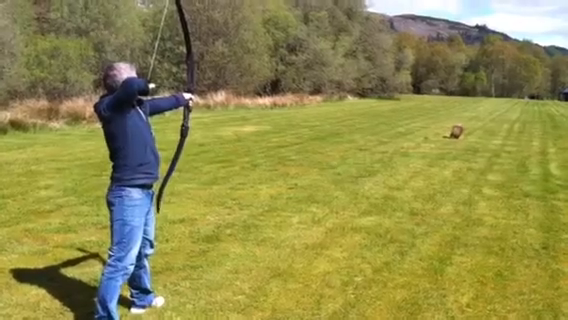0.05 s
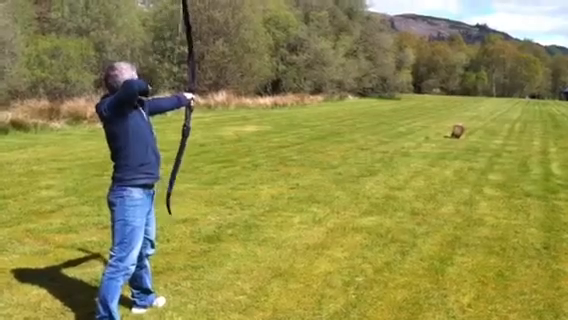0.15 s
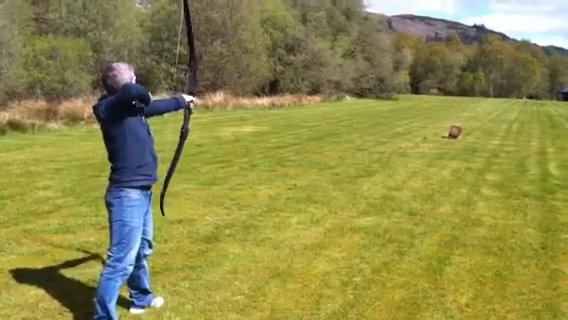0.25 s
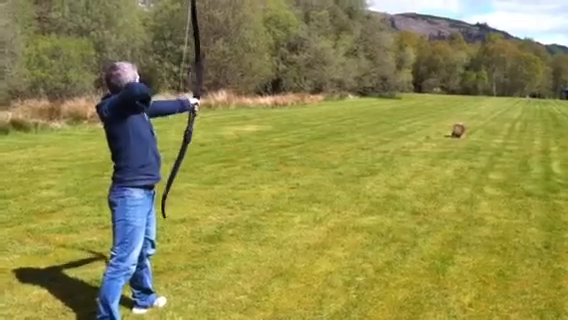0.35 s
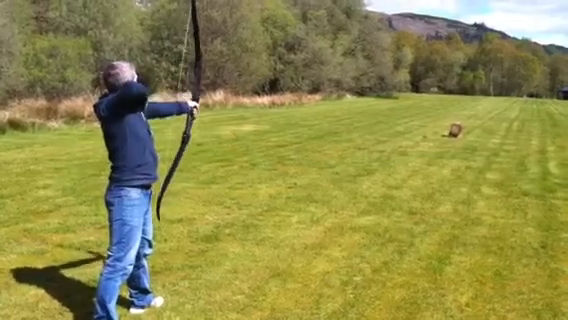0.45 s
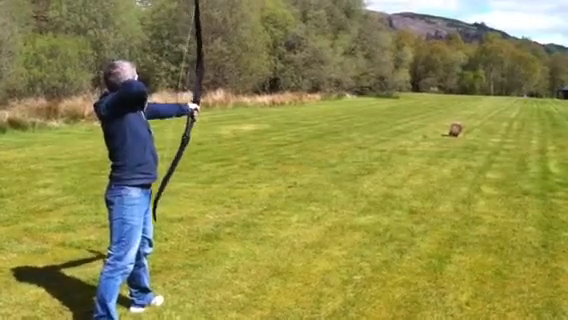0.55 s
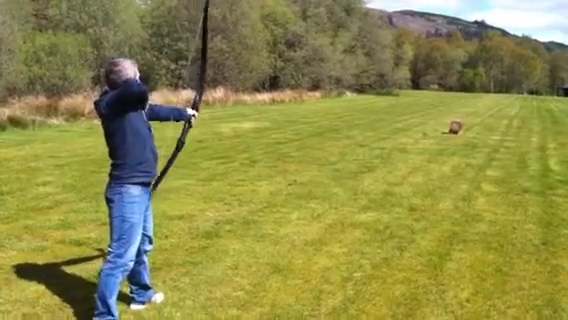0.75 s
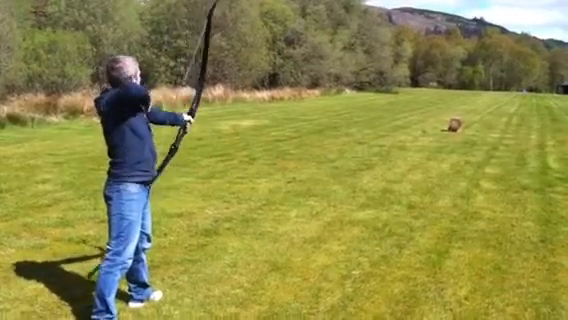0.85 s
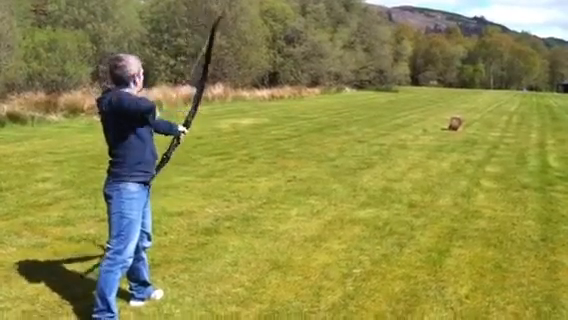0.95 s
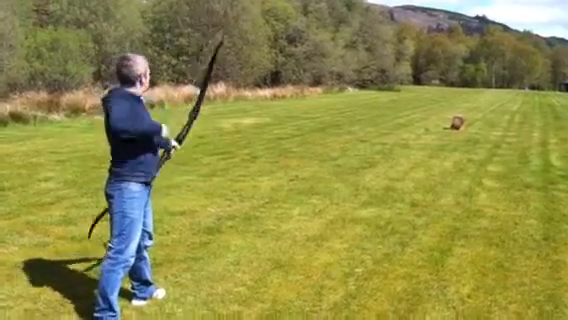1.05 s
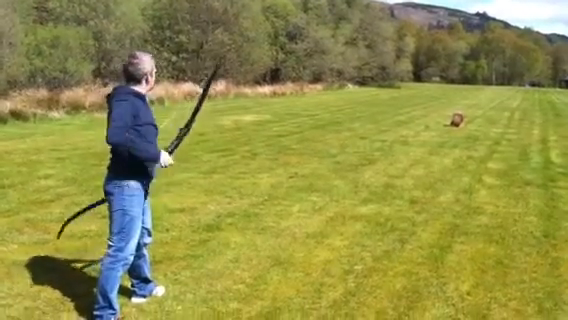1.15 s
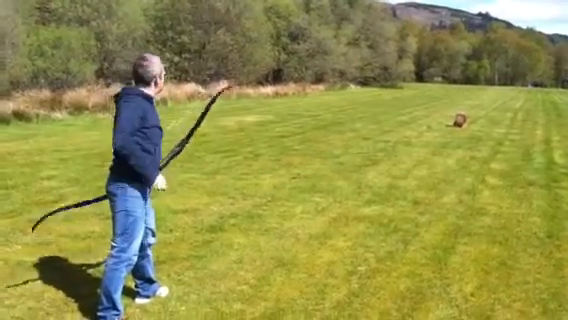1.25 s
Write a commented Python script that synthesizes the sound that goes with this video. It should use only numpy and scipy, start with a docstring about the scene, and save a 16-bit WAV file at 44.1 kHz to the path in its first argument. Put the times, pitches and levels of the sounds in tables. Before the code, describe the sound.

Sharp bowstring snap near the microphone, rattling and ringing the bow for an instant, then humming away. Thin bird whistles and soft outdoor air surround it; a faint distant tap follows, then dull low handling bumps.

```python
"""An arrow is shot on an open field. From the start there is quiet outdoor air (coloured noise), a hiss of
distant birdsong (noise that swells and sinks) and a songbird (gliding whistles smeared by the trees).
The string slips off the fingers (short tones) and the arrow ticks and scrapes along the bow (noise), with a
faint answer from the field. The string slaps home and rebounds, mostly duller each time, ringing the bow
(fading tones and noise), and hums on. Then comes a faint far tap, and near the end soft bumps on the microphone."""
import sys
import numpy as np
from scipy import signal
from scipy.fft import rfft, irfft, next_fast_len
from scipy.io import wavfile
from scipy.ndimage import map_coordinates

SR = 44100
rng = np.random.default_rng(int(sys.argv[2]) if len(sys.argv) > 2 else 0)


def dump(signal):
    """Clip the signal to [-1, 1] and save it as 16-bit WAV at the path in sys.argv[1]."""
    limited = np.clip(np.atleast_2d(signal).T, -1, 1)
    pcm = np.round(limited * 32767).astype(np.int16)
    wavfile.write(sys.argv[1], SR, pcm)


N = 57330  # length in samples, 1.3 s


def amp(db):
    """Turn decibels into a plain multiplier."""
    return 10 ** (np.asarray(db) / 20)


def unit(x):
    """Scale x to an average (rms) strength of 1."""
    return x / np.sqrt(np.mean(x ** 2) + 1e-20)


def along(points, hz):
    """Read a curve of (f/Hz, value) points, with pitch on a log axis."""
    f, value = np.transpose(points)
    return np.interp(np.log(hz + 1), np.log(f + 1), value)


def since(s):
    """Seconds passed since time s, zero before it."""
    return np.maximum(np.arange(N) / SR - s, 0)


def fade(t, t60):
    """Die away smoothly, by 60 dB every t60 seconds."""
    return np.exp(-np.log(1000) * t / t60)


def rise(t, rise_s):
    """Grow from 0 towards 1, quickly at first and then ever more slowly."""
    return 1 - np.exp(-t / rise_s)


def wobble(rate):
    """A smooth random curve through `rate` random points a second."""
    points = rng.standard_normal(int(N * rate / SR) + 4)
    return map_coordinates(points, [np.arange(N) * rate / SR])


def filtered(x, response):
    """Strengthen or weaken each frequency of x as `response` says."""
    m = next_fast_len(N + SR // 2)  # spare room, so the end does not wrap round to the start
    return irfft(rfft(x, m) * response(np.fft.rfftfreq(m, 1 / SR)), m)[:N]


def noise(spectrum):
    """Random hiss coloured by a spectrum, with rms 1."""
    return unit(filtered(rng.standard_normal(N), lambda hz: amp(along(spectrum, hz))))


def dying(spectrum, t60s):
    """Coloured noise in which each frequency dies at its own speed."""
    hz, t, slices = signal.stft(noise(spectrum), SR, nperseg=128)
    fading = slices * fade(t, along(t60s, hz)[:, None])
    return signal.istft(fading, SR, nperseg=128)[1][:N]


def delayed(x, s):
    """Make x start at time s."""
    return np.pad(x, (max(int(s * SR), 0), 0))[:N]


def ring(s, hz, db, t60, phase=0):
    """One pure tone that is struck at time s and dies away."""
    t = since(s)
    return amp(db) * (t > 0) * np.sin(2 * np.pi * hz * t + phase) * fade(t, t60)


# colour of the outdoor air: f/Hz, relative level/dB per Hz
AIR_SPECTRUM = [(25, -7), (55, -17), (90, -12), (150, -1), (230, -3), (380, -6.5), (700, -4), (1300, -10),
                (2500, -14.5), (5000, -15.5), (7000, -19.5), (15500, -21.5)]
AIR_DB, AIR_SWAY_DB = -62.5, 0.1  # middle level, and spread of the random sway


def air():
    """Quiet outdoor air: coloured noise whose level sways very slightly."""
    return amp(AIR_DB + AIR_SWAY_DB * wobble(6.2)) * noise(AIR_SPECTRUM)


# how loud the distant birdsong is over time: t/s, level/dB
WASH_LEVEL = [(0, -73), (.08, -61.5), (.15, -73.5), (.45, -67), (.53, -67.5), (.67, -64), (.8, -72),
              (1.3, -77.5)]
# colour of the distant birdsong: f/Hz, relative level/dB per Hz
WASH_SPECTRUM = [(2000, -26), (2900, -2.5), (3400, -2), (4200, -2), (5200, -6), (6200, -11.5), (8000, -60)]


def wash():
    """Song from deep in the wood, blurred to a hiss, so noise in the pitch range of birds."""
    s, db = np.transpose(WASH_LEVEL)
    return amp(np.interp(np.arange(N) / SR, s, db)) * noise(WASH_SPECTRUM)


# bird notes, levels before flutter and mixing: t/s, length/s, first f/Hz, middle f/Hz, last f/Hz, level/dB
# (the pitches also waver a little)
BIRD_NOTES = [(0, 0.048, 3650, 3850, 4120, -62), (0.032, .026, 4210, 4520, 5180, -58.5),
              (0.061, 0.015, 5820, 5050, 5400, -59), (0.07, 0.015, 3160, 3400, 3770, -58.5),
              (.096, 0.014, 3580, 3350, 3200, -57), (0.167, 0.087, 3780, 3800, 4620, -57),
              (0.292, 0.033, 4360, 4350, 4230, -65), (0.341, 0.0536, 3700, 3750, 3520, -63),
              (0.401, 0.078, 3640, 4250, 5220, -60.5), (0.508, 0.03, 2930, 3150, 3430, -63.5),
              (.545, 0.028, 3500, 4080, 4250, -52), (0.572, 0.03, 4290, 4320, 4240, -57.5),
              (0.621, 0.066, 3450, 3533, 3680, -63), (0.629, 0.05, 3590, 4200, 4800, -69),
              (.829, 0.02, 5550, 5300, 5050, -68.5), (.916, .014, 6000, 5400, 4670, -72),
              (0.934, .022, 5380, 5050, 4960, -67), (0.987, 0.02, 3050, 3150, 3200, -71),
              (1.025, 0.013, 6500, 5600, 5200, -71), (1.049, .036, 5450, 4800, 5450, -61.5),
              (1.083, 0.024, 5450, 5750, 5640, -71), (1.13, 0.019, 6600, 5660, 5000, -71),
              (1.156, .052, 5210, 4200, 3540, -61.5), (1.201, 0.03, 3820, 3650, 3300, -63.5),
              (1.253, 0.025, 3500, 3150, 3080, -66.5)]
BIRD_WAVER, BIRD_FLUTTER_DB = 0.0072, 2.5  # random spread of pitch (as a fraction) and of level
BIRD_DB, TREES_DB = 0.5, -2.5  # gain of the direct song and of the song smeared by the trees
TREES_T60_S, TREES_RISE_S = .6, .025


def bird():
    """Gliding whistles, heard directly and scattered by the trees into a smear of tiny echoes."""
    song = np.zeros(N)
    waver = 1 + BIRD_WAVER * wobble(250)
    flutter = amp(BIRD_FLUTTER_DB * wobble(120.86))
    for s, length, first, middle, last, db in BIRD_NOTES:
        u = np.minimum(since(s) / length, 1)  # 0 at the start of the note, 1 at its end
        # a smooth curve through the three pitches
        hz = first * (1 - u) * (1 - 2 * u) + middle * 4 * u * (1 - u) + last * u * (2 * u - 1)
        swell = np.sqrt(np.abs(np.sin(np.pi * u)))
        song += amp(db) * swell * np.sin(2 * np.pi * np.cumsum(hz * waver) / SR)
    song = song * flutter
    tail = rng.standard_normal(N) * fade(since(0), TREES_T60_S) * rise(since(0), TREES_RISE_S)
    smeared = signal.fftconvolve(song, tail / np.linalg.norm(tail))[:N]
    return amp(BIRD_DB) * song + amp(TREES_DB) * smeared


SCRAPE_S, SCRAPE_RISE_S, SCRAPE_HOLD_S, SCRAPE_T60_S, SCRAPE_DB = .236, 0.0069, 0.02, 0.032, -37
SCRAPE_GRAIN_DB, SCRAPE_GRAINS_PER_S = 3.5, 900  # roughness: spread of level, and its speed
# colour of the scrape: f/Hz, relative level/dB per Hz
SCRAPE_SPECTRUM = [(100, -14), (400, 1), (1100, -2), (2400, 4), (3500, -9.5), (5000, -7), (10000, -10.5),
                   (16000, -17)]


def scrape():
    """The arrow slides grittily along the bow: noise with a fast, random roughness."""
    hold_end = SCRAPE_S + SCRAPE_RISE_S + SCRAPE_HOLD_S
    growth = np.minimum(since(SCRAPE_S) / SCRAPE_RISE_S, 1) ** 2
    slide = growth * fade(since(hold_end), SCRAPE_T60_S)
    roughness = amp(SCRAPE_GRAIN_DB * wobble(SCRAPE_GRAINS_PER_S))
    return amp(SCRAPE_DB) * slide * unit(noise(SCRAPE_SPECTRUM) * roughness)


# the string slipping off the fingers: t/s, f/Hz, level/dB, t60/s
SLIP = [(0.2368, 520, -35, 0.025), (.2408, 673, -37.5, 0.055)]


def slip():
    """The string rolls off the fingers: short tones that die quickly."""
    return sum(ring(*row) for row in SLIP)


# the field's answer: f/Hz, relative level/dB per Hz
FIELD_SPECTRUM = [(100, -4), (500, -0.5), (1500, -14.5), (3500, -9.5), (7000, -7), (15000, -19)]
# how long each pitch of the answer lasts: f/Hz, t60/s
FIELD_T60 = [(200, 0.97), (2000, 0.71), (10000, 1.3)]
FIELD_DB = -21


def field(shot):
    """Faint scatter of the shot from the grass and the edge of the wood: many tiny, dying echoes."""
    tail = dying(FIELD_SPECTRUM, FIELD_T60)
    return amp(FIELD_DB) * signal.fftconvolve(shot, tail / np.linalg.norm(tail))[:N]


# sharp ticks of the nock and arrow, levels before they are halved: t/s, level/dB
TICKS = [(0.2418, -28), (0.242, -26), (0.2641, -21), (0.2753, -24.5)]
# colour of a tick: f/Hz, relative level/dB per Hz
TICK_SPECTRUM = [(300, -13), (2500, 5), (6500, -4), (11000, -3), (16000, -31)]
TICK_T60_S = .002


def ticks():
    """The nock and arrow click: tiny bursts of noise that are gone almost at once."""
    out = np.zeros(N)
    for s, db in TICKS:
        burst = noise(TICK_SPECTRUM) * fade(since(0), TICK_T60_S)
        out += .5 * delayed(amp(db) * burst, s)
    return out


# the string slapping taut and rebounding, slap levels before mixing and filtering:
# t/s, level/dB, dull above f/Hz, thin below f/Hz, knock f/Hz, knock level/dB
SLAPS = [(.2523, -26.5, 5450, 1470, 3110, -27.5), (.2637, -30, 6000, 930, 1650, -28.5),
         (0.2766, -35, 2230, 660, 1990, -28.5), (0.2877, -34.5, 1900, 880, 1116, -26),
         (.3015, -42.5, 1410, 400, 603, -41)]
# tones of the bow's limbs and riser, levels before scatter and mixing: f/Hz, level/dB, t60/s
BOW_MODES = [(587, -16, .12), (764, -9, .14), (937, -14, .14), (1135, -4, .13), (1290, -4, .12),
             (1642, -6, .1), (1828, -10, .09), (1918, -9, .07), (2170, -6, .09), (2420, -7, .06),
             (2580, -7, .06), (2810, -4, .06), (3134, -5, .07), (3198, -5, .07), (3553, -7, .06),
             (4900, -16, .05)]
# colour of the rattle and crack: f/Hz, relative level/dB per Hz
RATTLE_SPECTRUM = [(60, -25), (200, 5.5), (600, 0), (1200, -0.5), (2200, 3), (3300, 9), (5000, -2),
                   (9000, -7.5), (16000, -1)]
# how long each pitch of the rattle lasts: f/Hz, t60/s
RATTLE_T60 = [(200, 0.2), (1000, 0.065), (3000, 0.039), (6000, .03), (14000, 0.014)]
RING_DB, RATTLE_DB, CRACK_DB = -5, -2.5, 0.5  # mix inside one slap (the ringing is also halved)
RING_SCATTER_DB = 3.5  # random spread of each tone's level from slap to slap
SLAP_RISE_S, CRACK_T60_S, KNOCK_T60_S, KNOCK_LAG_S = 0.00069, .018, 0.013, .0005


def bow_ringing():
    """The bow rings like a bar: many dying tones, each struck a little differently every time."""
    out = np.zeros(N)
    for hz, db, t60 in BOW_MODES:
        struck_db = db + RING_SCATTER_DB * rng.standard_normal()
        out += ring(0, hz, struck_db, t60, 2 * np.pi * rng.random())
    return out


def slaps():
    """Each slap of the string knocks, cracks, rattles and rings the bow; later ones are mostly duller."""
    out = np.zeros(N)
    for s, db, dull_hz, thin_hz, knock_hz, knock_db in SLAPS:
        ringing = amp(RING_DB) * .5 * bow_ringing()
        rattle = amp(RATTLE_DB) * dying(RATTLE_SPECTRUM, RATTLE_T60)
        crack = amp(CRACK_DB) * noise(RATTLE_SPECTRUM) * fade(since(0), CRACK_T60_S)
        blow = (ringing + rattle + crack) * rise(since(0), SLAP_RISE_S)

        def contact(f):
            """Weaken the lows below thin_hz and the highs above dull_hz."""
            thinning = 1j * f / (thin_hz + 1j * f)
            return thinning / (1 + np.sqrt(2) * 1j * f / dull_hz - (f / dull_hz) ** 2)

        out += 2 * amp(db) * filtered(delayed(blow, s), contact)
        out += ring(s + KNOCK_LAG_S, knock_hz, knock_db, KNOCK_T60_S)
    return out


# the limbs' recoil through the handle: t/s, f/Hz, level/dB, t60/s
RECOIL = [(0.2556, 254, -36, 0.032)]


def recoil():
    """The limbs kick back through the handle: a low tone that dies quickly."""
    return sum(ring(*row) for row in RECOIL)


# tones of the string's hum: f/Hz, level/dB, t60/s
HUM_MODES = [(111.2, -64.5, 0.59), (165, -54, .25), (229.2, -53.5, 0.48), (335.7, -49, 0.44),
             (452, -51, 0.57), (521, -52, 0.26), (1140, -65, 0.24), (1372, -54.5, 0.34)]
HUM_S, HUM_RISE_S = .262, .008


def hum():
    """The taut string hums on: several tones that swell in quickly and die slowly."""
    return rise(since(HUM_S), HUM_RISE_S) * sum(ring(HUM_S, *mode) for mode in HUM_MODES)


TAP_S, TAP_DB, TAP_RISE_S, TAP_T60_S = .781, -56, 0.0032, 0.068
# colour of the tap: f/Hz, relative level/dB per Hz
TAP_SPECTRUM = [(300, -9), (1000, -3), (1800, 8), (3000, -8), (7000, -4), (15000, -20)]


def tap():
    """A faint, far tap, perhaps the arrow landing: a short burst of noise with a soft start."""
    t = since(TAP_S)
    return amp(TAP_DB) * rise(t, TAP_RISE_S) * fade(t, TAP_T60_S) * noise(TAP_SPECTRUM)


# soft bumps on the microphone: middle t/s, f/Hz, width/s, level/dB
BUMPS = [(1.1178, 162, 0.0045, -55.5), (1.1727, 158, 0.0032, -39.5), (1.1979, 144, 0.0071, -48.5)]


def bumps():
    """Dull, rounded knocks on the microphone: low tones inside a bell-shaped swell."""
    t = np.arange(N) / SR
    out = np.zeros(N)
    for s, hz, width, db in BUMPS:
        swell = np.exp(-((t - s) / width) ** 2)
        out += amp(db) * swell * np.cos(2 * np.pi * hz * (t - s))
    return out


def scene():
    """The background and birds, the shot and its answer from the field, the tap and the bumps."""
    background = air() + wash() + bird()
    shot = scrape() + slip() + ticks() + slaps() + recoil() + hum()
    return (background + shot + field(shot) + tap() + bumps())[None]


LOW_CUT_HZ, TOP_HZ = 73, 16000


def record(dry):
    """Thin the deep bass gradually and remove everything from the top frequency upwards."""
    def response(hz):
        bass = (hz / LOW_CUT_HZ) ** 2
        return bass / np.hypot(1, bass) * (hz < TOP_HZ)

    return filtered(dry[0], response)[None]


dry = scene()
out = record(dry)
dump(out)
```